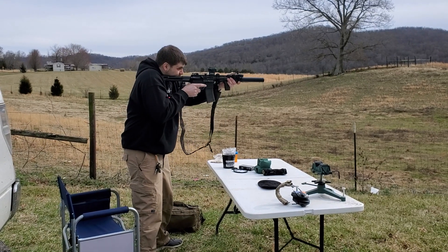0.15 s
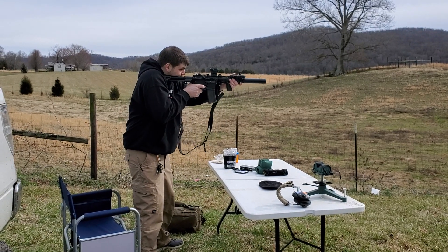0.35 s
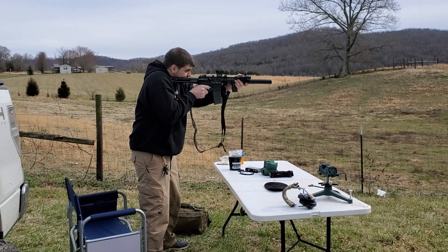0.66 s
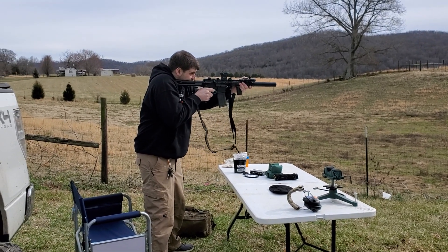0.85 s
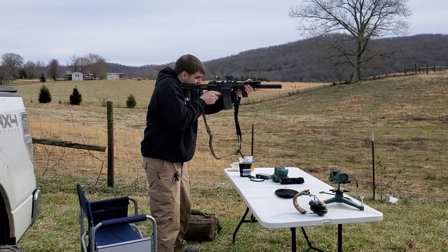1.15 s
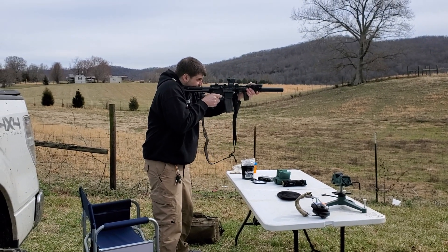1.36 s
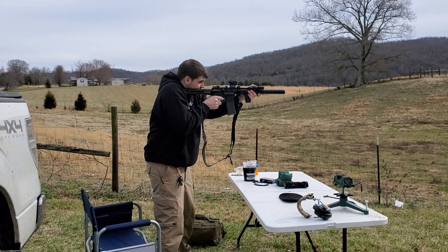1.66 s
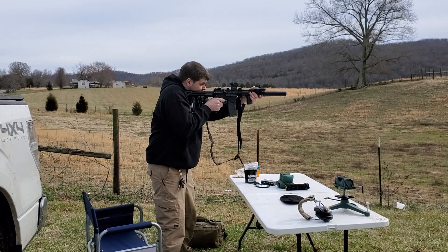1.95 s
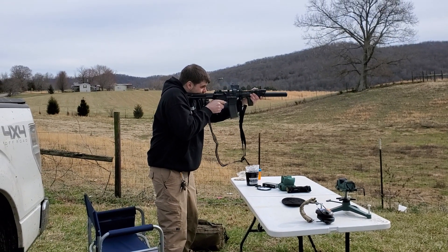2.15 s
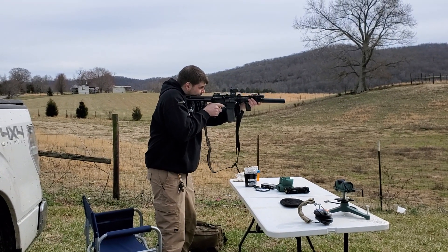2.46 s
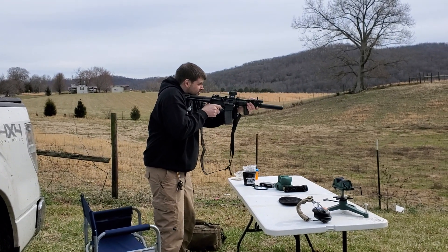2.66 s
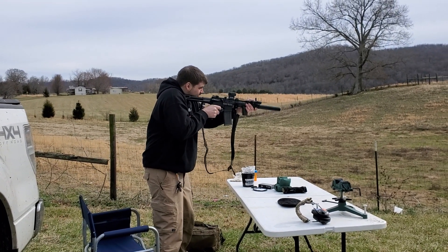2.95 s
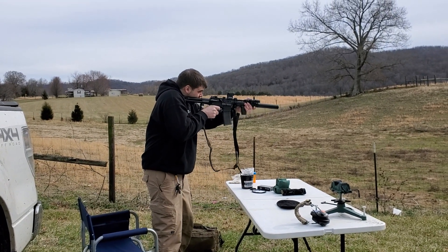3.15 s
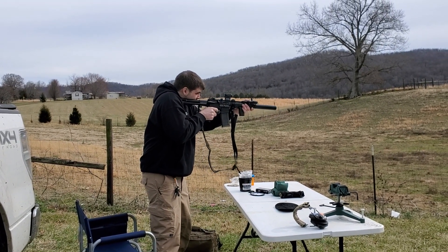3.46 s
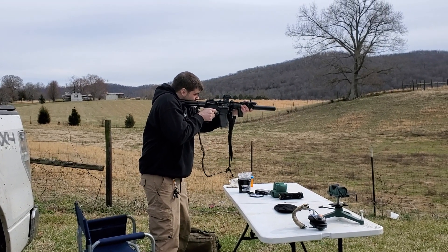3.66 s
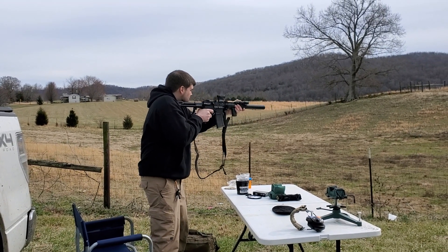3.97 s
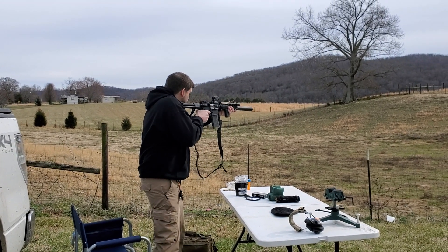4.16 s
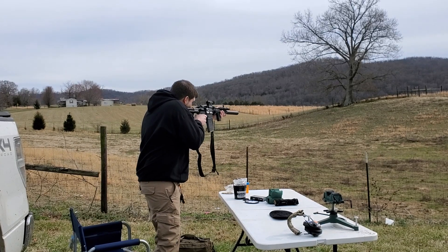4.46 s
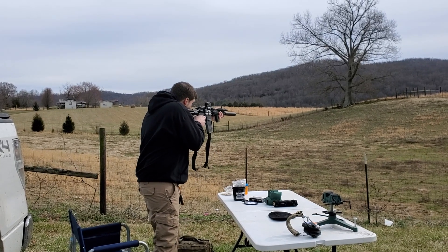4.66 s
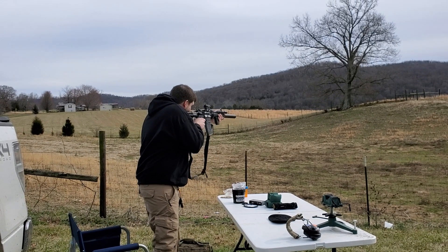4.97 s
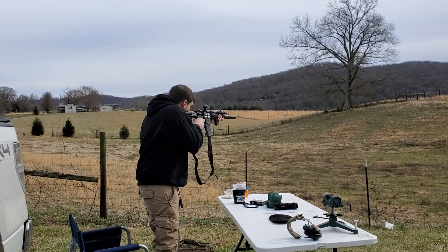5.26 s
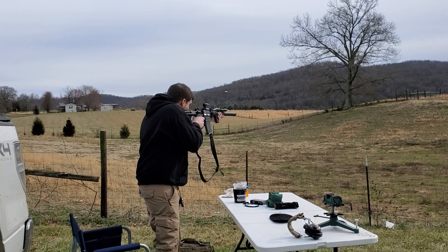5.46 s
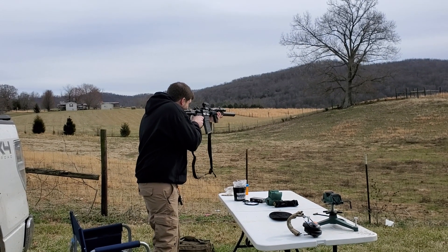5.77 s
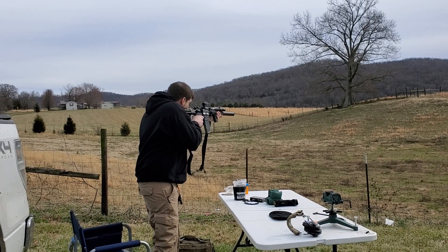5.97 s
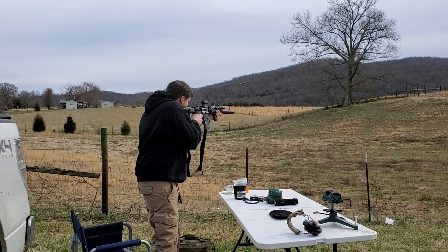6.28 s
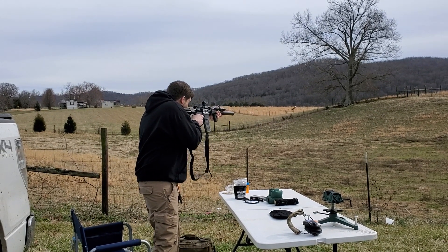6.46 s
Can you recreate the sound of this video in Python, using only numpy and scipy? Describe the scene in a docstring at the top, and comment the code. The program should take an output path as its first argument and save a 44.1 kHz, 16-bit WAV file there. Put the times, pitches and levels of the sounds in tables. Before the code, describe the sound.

Open country, heard a few steps from the shooter through a stereo microphone exposed to wind. Faint hush, low uneven buffeting, and a small gear click and sleeve brush at 0.1 s. At 1.1 s a suppressed rifle fires: a crisp, compressed crack with a hollow pop, venting gas and a clacking bolt; a bullet clangs loudly on steel at 1.3 s. A second shot at 2.1 s gives a weaker, higher plate ring at 2.3 s, then a barely audible whining ricochet around 2.6 s. Brass ticks lightly. Diffuse field tails and a faint tree-covered hill echo follow. Wind thumps and rumbles, strongest on the right around 4.2-4.5 s. Duller shots come at 5.0 and 5.4 s, with hollow earthy thuds at 5.3 and 5.6 s; another at 6.1 s thuds at 6.4 s. A final shot lands at 6.6 s, right at the end.

```python
"""A suppressed semi-automatic rifle fires six shots across an open field, a few steps away.
Each shot layers noise bursts for hammer, muzzle blast, venting gas and slamming bolt.
Bullets ring steel (decaying sines) or thud into earth (damped low swings under sprays of noise).
Spent cases tick in the grass, and a wooded hill answers with flickering noise tails.
Wind buffets the two microphone ports with low noise and single eddies, over a faint hush."""
import sys
import numpy as np
from scipy import signal
from scipy.fft import rfft, irfft, next_fast_len
from scipy.io import wavfile
from scipy.ndimage import map_coordinates

SR = 44100
rng = np.random.default_rng(int(sys.argv[2]) if len(sys.argv) > 2 else 0)


def store_wav(level_fs):
    """Save 16-bit WAV to argv[1]."""
    pcm = np.round(np.clip(np.atleast_2d(level_fs), -1, 1) * 32767)
    wavfile.write(sys.argv[1], SR, pcm.T.astype(np.int16))


N = 291942
TIME = np.arange(N) / SR
AGE = TIME[:SR + SR // 2]  # time since an event began (s)

# the six shots: start_s, blast_db, blast_left_minus_right_db, treble_tilt_db, field_echo_db, case_ring_db
SHOTS = [(1.1179, -15, -2, 14.5, -32, -43.5), (2.0993, -17.5, -5.5, 10, -32.5, -45),
         (4.984, -20, -6, 1.5, -36.5, -69), (5.3698, -21, -5, 4.5, -39.5, -62),
         (6.0944, -20.5, -4.5, 5, -38.5, -64), (6.6182, -20, -5, 3, -45, -69)]
# spectrum of venting gas, also of brushed cloth: pitch_hz, relative_level_db
GAS_SPECTRUM = [(100, -12.5), (400, -4), (900, -7), (1600, -1.5), (3500, -0.5), (7000, 2), (11000, -0.5),
                (15000, -7.5)]
# spectrum of the wooded hill's answer: pitch_hz, relative_level_db
HILL_SPECTRUM = [(200, -7), (700, -3), (1200, -1.5), (2300, 4), (3300, -1.5), (5000, -9), (9000, -20.5),
                 (15000, -36)]


def rifle():
    """Hammer, first leak of gas, pressure spike, blast through the baffles, venting action, bolt."""
    # spectrum of the muzzle blast: pitch_hz, relative_level_db
    blast = [(50, -17.5), (200, -2.5), (450, -0.5), (900, -4.5), (3500, 1.5), (6000, -6.5), (10000, -7.5),
             (15000, -11.5)]
    # spectrum of the hissing jet: pitch_hz, relative_level_db
    jet = [(3000, -32), (9000, -14), (12000, -10), (15000, -2)]
    # spectrum of hammer and bolt: pitch_hz, relative_level_db
    bolt = [(100, -7), (400, -11), (800, -6.5), (2000, 0), (5000, 2), (9000, -1), (15000, -5)]
    # resonances of the rifle: pitch_hz, width_hz, boost_db
    body = [(647, 42, 11.5), (1030, 200, 0.5), (1620, 420, 8), (2270, 250, 5), (3180, 150, 5.5),
            (3830, 140, -1.5), (4340, 260, 4.5), (4770, 120, 3), (5840, 47, 5)]
    # the action cycles alike on every shot: times from the blast, levels relative to it
    hammer_lead_s, leak_lead_s, bolt_delay_s = .0095, 0.0063, .0706
    hammer_db, leak_db, gas_db = -6, -12, -12
    bolt_db = -19.5  # the spring, not the powder, sets the force of the bolt: same level on every shot
    out = np.zeros((2, N))
    u = AGE[:SR // 50] / 0.00014
    spike = filtered((1 - u) * np.exp(-u), lambda hz: 1 / (1 + 1j * hz / 3000) ** 2)
    for s, db, pan_db, tilt_db, *_ in SHOTS:
        hammer = burst(bolt, 0.00021, 0.00033, 0.0049, tilt_db=1.5)
        add(out, s - hammer_lead_s, amp(db + hammer_db) * panned(4) * hammer)
        leak = burst(GAS_SPECTRUM, 0.0011, 0.0053, 0.0058, tilt_db=-7)
        add(out, s - leak_lead_s, amp(db + leak_db) * panned(-2) * leak)
        add(out, s, amp(db + 18.5) * panned(pan_db - 3) * spike)
        muzzle = burst(blast, 0.00038, 0.0087, 0.068, tilt_db, body, sputter_db=3)
        add(out, s, amp(db) * panned(pan_db) * muzzle)
        hiss = burst(jet, .001, 0.016, .04, sputter_db=3)
        add(out, s + 0.0027, amp(db - 10.5) * panned(2) * hiss)
        venting = burst(GAS_SPECTRUM, .005, 0.047, 0.13, bumps=body, sputter_db=0.5)
        add(out, s + .006, amp(db + gas_db) * venting)
        slam = burst(bolt, 0.0008, 0.004, 0.055, bumps=body, sputter_db=3)
        add(out, s + bolt_delay_s, amp(bolt_db) * panned(1) * slam)
    return out


def first_round_pop(db=-20, hz=280):
    """Air in the cold suppressor burns on the first shot and adds a hollow pop."""
    out = np.zeros((2, N))
    add(out, SHOTS[0][0], amp(db) * panned(-14) * push(hz, cycles=.9))
    return out


def flying_cases():
    """Hot brass sings as it spins out of the port."""
    out = np.zeros((2, N))
    for s, *_, ring_db in SHOTS:
        ring = narrow(6720, 320) * swell(AGE, 0.037, 0.13, 0.31)
        add(out, s + .05, amp(ring_db) * panned(4) * ring)
    return out


def steel():
    """A bullet splashes on a plate; the plate rings, and field and hill carry the clang on."""
    # bullets on steel: start_s, splash_db, ring_db (before a shared trim), left_minus_right_db,
    # treble_tilt_db, hill_echo_db
    hits = [(1.3024, -15.5, -20.5, 7.5, 2, -57.5), (2.279, -21, -35.5, -0.5, 3.5, -72)]
    # modes of the large plate: pitch_hz, relative_level_db, t60_s
    big_plate = [(699, -4, .27), (1640, -13, .25), (1785, -10, .28), (2101, -2, .22), (2422, -4, .26),
                 (2740, -9, .2), (2853, -10, .24), (3397, -16, .26), (3747, -9, .13), (5017, -15, .2),
                 (6142, -18, .2), (8177, -3, .12), (9251, -4, .12), (10642, -3, .1), (10880, -2, .09),
                 (13180, -11, .07)]
    # modes of the small plate: pitch_hz, relative_level_db, t60_s
    small_plate = [(700, -8.5, 0.33), (1100, -3, 0.21), (2064, -15, .15), (2450, -19, 0.19),
                   (3120, -3, 0.26), (4370, 5, 0.19), (4800, -16.5, 0.099), (6153, -4, .25)]
    # spectrum of the splash: pitch_hz, relative_level_db
    splash = [(100, -5.5), (400, -9), (700, -10), (1000, -12.5), (1400, -3.5), (2300, 5.5), (3300, 2),
              (4500, 1), (7000, -2.5), (11000, -4.5), (15000, -8.5)]
    ring_trim_db = -5.5
    out = np.zeros((2, N))
    for hit, plate in zip(hits, (big_plate, small_plate)):
        s, db, ring_db, pan_db, tilt_db, hill_db = hit
        modes = [(hz, 50, 14 * np.exp(-hz / 4500)) for hz, _, _ in plate]  # the low modes carry farthest
        impact = burst(splash, 0.00011, 0.0024, 0.072, tilt_db, sputter_db=3)
        add(out, s, amp(db) * panned(pan_db) * impact)
        field_clang = burst(splash, 0.0041, .01, 0.37, tilt_db=-8.5, bumps=modes)
        add(out, s + 0.0049, amp(db - 16.5) * field_clang)
        hill_clang = noise(HILL_SPECTRUM, len(AGE), -6.0, modes, ripple_db=4.5)
        add(out, s + 0.15, amp(hill_db) * hill_clang * flicker(3) * swell(AGE, .08, 0.19, 1.4))
        # the lowest mode lingers in the echoes
        lingering = narrow(plate[0][0], 35) * flicker(3) * swell(AGE, .03, 0.53, 2.0)
        add(out, s, amp(hill_db - 13) * lingering)
        for hz, mode_db, t60 in plate:
            phase = rng.uniform(0, 2 * np.pi) + rng.normal(0, 0.97, (2, 1))  # differs left to right
            mode = np.sin(2 * np.pi * hz * AGE + phase) * swell(AGE, .0005, 0, t60)
            add(out, s, amp(ring_db + mode_db + ring_trim_db) * mode)
    return out


def ricochet(s=2.63, db=-69, hz=3200, slowing=.04):
    """A spinning fragment whines away, its pitch sinking as it loses speed."""
    out = np.zeros((2, N))
    tumble = narrow(0, 65)
    whine = np.sin(2 * np.pi * np.cumsum(hz * (1 - slowing * AGE)) / SR)
    add(out, s, amp(db) * tumble * whine * swell(AGE, 0.016, 0.15, .6))
    return out


def earth():
    """A bullet slaps the bank: a spray of soil over a hollow thud, then crumbs settle."""
    # bullets in earth: start_s, thud_db, thud_hz, spray_db, treble_tilt_db
    hits = [(5.262, -16.5, 240, -25.5, 0.5), (5.6441, -22.5, 256, -27, -0.5), (6.374, -18, 258, -26, -9)]
    # spectrum of flying soil: pitch_hz, relative_level_db
    soil = [(200, 15.5), (800, -1.5), (1700, -8), (2800, 4), (5000, -5), (9000, -11.5), (15000, -15.5)]
    out = np.zeros((2, N))
    for s, thud_db, hz, spray_db, tilt_db in hits:
        spray = burst(soil, 0.00083, 0.0038, 0.029, tilt_db)
        add(out, s, amp(spray_db) * panned(-0.14) * spray)
        add(out, s + 0.00201, amp(thud_db) * push(hz, cycles=0.78))
        crumbs = burst(soil, 0.0017, 0.016, 0.71, tilt_db=-13.5, sputter_db=3)
        add(out, s + 0.0036, amp(spray_db - 26.0) * crumbs)
    return out


def echoes():
    """The near field answers at once, the wooded hill half a second later, from two belts of trees."""
    # round trips to the two belts of trees: near_s, far_s
    near, far = (.478, .55)
    out = np.zeros((2, N))
    for s, *_, field_db, _ in SHOTS:
        hill_db = field_db - 21.5
        add(out, s + 0.037, amp(field_db) * panned(2.2) * field_tail() * flicker(1.6))
        near_trees = noise(HILL_SPECTRUM, len(AGE), 4.1, ripple_db=5.5) * flicker(4.0)
        add(out, s + near, amp(hill_db) * near_trees * swell(AGE, 0.027, 0.025, 0.17))
        far_trees = noise(HILL_SPECTRUM, len(AGE), -12.5, ripple_db=6) * flicker(2.2)
        add(out, s + far, amp(hill_db - 13.0) * far_trees * swell(AGE, 0.01, 0.053, .7))
    return out


def field_tail():
    """Scatter from grass and fences; the treble dies first."""
    # spectrum of the scatter: pitch_hz, relative_level_db
    scatter = [(200, -1.5), (700, -10.5), (1600, -6), (4500, -1.5), (6700, 2.5), (9000, -3), (15000, -5)]
    # decay of the scatter: pitch_hz, t60_s
    decay = [(300, .7), (2000, 0.88), (6000, 0.68), (15000, 0.41)]
    hz, t, z = signal.stft(noise(scatter, len(AGE), ripple_db=3.5), SR, nperseg=256)
    fade = amp(-60 * t / along(decay, hz)[:, None])
    tail = signal.istft(z * fade, SR, nperseg=256)[1]
    return tail[:, :len(AGE)] * (1 - np.exp(-AGE / 0.0098))


def flicker(depth_db):
    """Echoes from scattered trees and posts arrive unevenly."""
    knots = np.arange(0, AGE[-1], .02)
    return unit(amp(depth_db * np.interp(AGE, knots, rng.standard_normal(len(knots)))))


def handling():
    """Cases drop, gear clicks and a sleeve brushes the stock."""
    # landing cases and small clicks of gear: start_s, level_db, centre_hz, t60_s
    ticks = [(0.0804, -41, 230, 0.071), (0.0757, -44.5, 2820, 0.005), (0.1004, -43.5, 11200, 0.036),
             (0.632, -52, 8900, 0.0059), (1.7520, -44.5, 6260, 0.0079), (1.8745, -50.5, 5170, 0.061),
             (2.891, -50, 7400, 0.071), (3.324, -68.5, 2900, 0.066), (5.1600, -41, 2680, 0.031),
             (5.762, -45.5, 8030, 0.14), (6.2550, -41.5, 2740, 0.03)]
    out = np.zeros((2, N))
    for s, db, hz, t60 in ticks:
        spectrum = [(hz / 8, -14), (hz / 2, -7), (hz, 0), (hz * 2, -13), (hz * 4, -20)]
        add(out, s, amp(db) * burst(spectrum, 0.0008, 0.00092, t60, bumps=[(hz, hz / 6, 5)]))
    sleeve = burst(GAS_SPECTRUM, 0.0015, 0.044, 0.18)
    add(out, .103, amp(-47) * panned(-25) * sleeve)
    return out


def wind():
    """Each port has its own turbulence; in stronger wind the higher flutter grows fastest."""
    # the hardest eddies striking a port: start_s, level_db (before a shared trim), pitch_hz,
    # left_minus_right_db
    hard_eddies = [(0.63, -25, 131, 19), (0.777, -21.5, 140, 30), (1.076, -16.5, 89, -29),
                   (1.607, -19.5, 140, 31), (1.927, -18.5, 230.3, 29.5), (1.993, -19, 148, 14),
                   (2.492, -25, 192, 24), (2.686, -23, 203, 34.5), (2.800, -22, 199, -4),
                   (2.875, -20, 238.5, -13.5), (2.916, -23, 272, -6), (3.086, -21, 167, 9.5),
                   (3.21, -21, 150, 18.5), (3.937, -17.5, 149, 23), (4.185, -11, 177, -31.5),
                   (4.224, -13, 220, -24.5), (4.309, -10.5, 320, -32.5), (4.45, -11, 184, -42),
                   (4.659, -15.5, 169, -22.5), (4.81, -17, 148, -11)]
    # spectrum of the deepest pressure swings: pitch_hz, relative_level_db
    deep = [(12, -11), (30, -1.5), (50, 3), (90, -17), (200, -51), (400, -84)]
    # spectrum of the rumble: pitch_hz, relative_level_db
    rumble = [(15, -19), (30, -11), (70, 8), (110, 0), (170, -13.5), (280, -29), (500, -54), (1000, -90.5)]
    # spectrum of the flutter: pitch_hz, relative_level_db
    flutter = [(60, -14.5), (140, 4.5), (260, -0.5), (450, -21.5), (800, -44.5), (1500, -60), (3000, -71)]
    strength_db = wind_db()
    force = amp(strength_db + 19.5)  # 1 in a hard gust
    out = amp(-33.5) * force ** 0.6 * turbulence(deep)
    out += amp(-21.5) * force * turbulence(rumble)
    lumps = unit(amp(5 * turbulence([(15, 0), (40, -20), (100, -80)])))
    out += amp(-27.5) * force ** 1.9 * lumps * turbulence(flutter)

    # each hard eddy rides in a swell of rumble
    buffet_db, buffet_s = -13.5, 0.032
    buffets = turbulence(rumble)
    for s, db, hz, pan_db in hard_eddies:
        add(out, s, amp(db - 8) * panned(pan_db) * eddy(hz))
        bell = np.exp(-((TIME - s) / buffet_s) ** 2)
        out += amp(db + buffet_db) * panned(pan_db) * buffets * bell

    # lesser eddies come at random and follow the wind strength at their port
    eddy_per_s, eddy_db, eddy_hz, scatter_db = 16, -4, 170, 1.5
    chance = rng.uniform(-1, 1, (200, 4))
    starts = np.cumsum(1 + chance[:, 0]) / eddy_per_s
    for s, (_, side, size, octave) in zip(starts, chance):
        if s < TIME[-1]:
            port = int(side > 0)
            db = strength_db[port, int(s * SR)] + eddy_db + scatter_db * size
            add(out[port:port + 1], s, amp(db) * push(eddy_hz * 2 ** (octave / 2), cycles=.5))
    return out


def wind_db():
    """Strength at each port: the slow gusts with a quick unrest on top."""
    # wind at the left port: time_s, strength_db
    left = [(0, -44.5), (.26, -59), (.42, -33), (.55, -42.5), (.7, -27), (.9, -40), (.97, -30.5),
            (1.06, -46.5), (1.55, -39.5), (2.05, -34), (2.3, -52), (2.48, -38.5), (2.62, -44), (3.0, -35),
            (3.35, -44), (3.73, -33), (3.85, -44.5), (4.55, -51.5), (4.82, -30), (5.1, -46.5), (6.6, -46.5)]
    # wind at the right port: time_s, strength_db
    right = [(0, -64), (.22, -44), (.44, -50.5), (.58, -30), (.68, -56), (.95, -66), (1.092, -23),
             (1.27, -54.5), (1.8, -48), (1.98, -34.5), (2.69, -49), (2.818, -23), (3.38, -52), (3.7, -30.5),
             (4.021, -48.5), (4.15, -25.5), (4.34, -18), (4.562, -28.5), (4.851, -25.5), (5.1, -33.5),
             (5.85, -36), (6.0, -51), (6.361, -28.5), (6.6, -47)]
    unrest_db, unrest_per_s = 2.5, 16
    slow = np.array([np.interp(TIME, *np.transpose(port)) for port in (left, right)])
    knots = rng.standard_normal((2, 400))
    unrest = np.array([map_coordinates(k, [TIME * unrest_per_s]) for k in knots])
    return slow + unrest_db * unrest


def turbulence(spectrum):
    """Churning air: separate shaped noise at each port, of rms 1 overall."""
    return unit(filtered(rng.standard_normal((2, N)), lambda hz: amp(along(spectrum, hz))))


def eddy(hz):
    """One whirl of air on a port: a low push with a rough edge."""
    edge = [(hz / 3, -6), (hz * 1.24, 0), (hz * 3, -20), (hz * 10, -70)]
    return push(hz, cycles=0.5) + amp(-13) * burst(edge, 0.0027, 0.01, .05)


def still_air():
    """The faint hush of open country, as steady noise."""
    # spectrum of the hush: pitch_hz, relative_level_db
    air = [(100, 5), (400, 3.5), (900, -10), (2000, -14.5), (4500, -20.5), (8000, -15), (10000, -21),
           (15000, -21.5)]
    return amp(-76.0) * panned(3) * noise(air, N)


def amp(db):
    """Decibels to a linear gain."""
    return 10 ** (np.asarray(db) / 20)


def unit(x):
    """Scale to rms 1."""
    return x / np.sqrt(np.mean(x ** 2) + 1e-20)


def along(points, hz):
    """Read (Hz, value) points on a log frequency axis."""
    f, v = np.transpose(points)
    return np.interp(np.log(hz + 1), np.log(f), v)


def filtered(x, response):
    """Shape the spectrum of x by a response of frequency."""
    size = x.shape[-1]
    m = next_fast_len(size + 4096)
    return irfft(rfft(x, m) * response(np.fft.rfftfreq(m, 1 / SR)), m)[..., :size]


def panned(pan_db):
    """Left and right gains of constant power."""
    g = np.array([amp(pan_db / 2), amp(-pan_db / 2)]).reshape(2, -1)
    return g / np.sqrt(np.mean(g ** 2, axis=0))


def noise(spectrum, size, tilt_db=0, bumps=(), ripple_db=0):
    """Stereo noise of rms 1 with a spectrum, a treble tilt, resonances and the ripple of short reflections."""
    # stereo likeness: pitch_hz, left_right_correlation
    alike = [(200, 1), (1000, 0.23), (3000, 0.26), (8000, 0.068), (15000, 0.17)]
    knots = rng.standard_normal((2, 200))

    def colour(hz):
        db = along(spectrum, hz) + tilt_db * along([(2500, 0), (12000, 1)], hz)
        db = db + sum(peak / (1 + (2 * (hz - f) / width) ** 2) for f, width, peak in bumps)
        # wider teeth in the treble
        ripple = np.array([np.interp(np.sqrt(hz), np.arange(len(k)), k) for k in knots])
        turn = np.arccos(np.clip(along(alike, hz), -1, 1)) / 2
        return amp(db + ripple_db * ripple) * [np.cos(turn), np.sin(turn)]

    mid, side = filtered(rng.standard_normal((2, size)), colour)
    return unit(np.array([mid + side, mid - side]))


def narrow(hz, width_hz):
    """A fuzzy tone: narrow-band noise, separate left and right, of rms 1 overall."""
    white = rng.standard_normal((2, len(AGE)))
    return unit(filtered(white, lambda f: np.exp(-((f - hz) / width_hz) ** 2)))


def swell(t, rise, hold, t60):
    """Rises, holds, then dies away by 60 dB in t60 (all in s)."""
    return (1 - np.exp(-t / rise)) * amp(-60 * np.maximum(t - hold, 0) / t60)


def burst(spectrum, rise, hold, t60, tilt_db=0, bumps=(), sputter_db=0):
    """A short puff of coloured noise, sputtering from one millisecond to the next."""
    t = AGE[:SR // 3]
    knots = np.arange(0, t[-1], .0015)
    jumps = rng.uniform(-1.5, 1.5, len(knots))
    sputter = unit(amp(sputter_db * np.interp(t, knots, jumps)))
    puff = noise(spectrum, len(t), tilt_db, bumps, ripple_db=3)
    return puff * sputter * swell(t, rise, hold, t60)


def push(hz, cycles):
    """A heavily damped low swing of pressure; its envelope peaks at 1 after the given cycles."""
    u = AGE[:SR // 3] * hz / cycles
    return -np.sin(2 * np.pi * u * cycles) * u ** 2 * np.exp(2 - 2 * u)


def add(out, s, sound):
    """Mix a sound in at time s."""
    part = out[:, max(round(s * SR), 0):][:, :sound.shape[-1]]
    part += sound[..., :part.shape[1]]


def scene():
    """Gun and bullets over echoes, handling, wind and air."""
    gun = rifle() + first_round_pop() + flying_cases()
    bullets = steel() + ricochet() + earth()
    return gun + bullets + echoes() + handling() + wind() + still_air()


def record(dry):
    """The ports colour the treble, peaks are rounded off, and a steep cut ends the band."""
    # colour of the ports: pitch_hz, left_db, right_db
    ports = np.array([(1000, 1.5, 2.5), (4500, -2, 1.5), (6500, -1, -1), (8300, 3, -4), (9360, -2, -3.5),
                      (10870, 2.5, 1), (13500, 13.5, 2), (15400, 12.5, 6.5)])
    top_hz, ceiling = 16000, .85
    left, right = ports[:, [0, 1]], ports[:, [0, 2]]
    x = filtered(dry, lambda hz: amp([along(left, hz), along(right, hz)]))
    x = x / (1 + np.abs(x / ceiling) ** 4) ** (1 / 4)
    return filtered(x, lambda hz: 1 / np.sqrt(1 + (hz / top_hz) ** 180))


dry = scene()
out = record(dry)
store_wav(out)
```